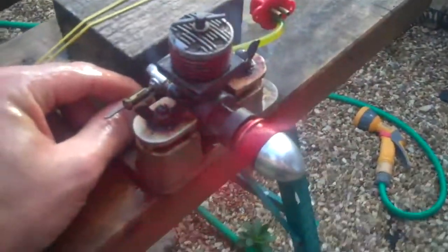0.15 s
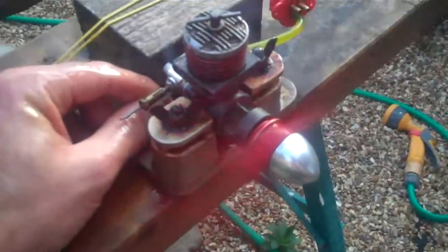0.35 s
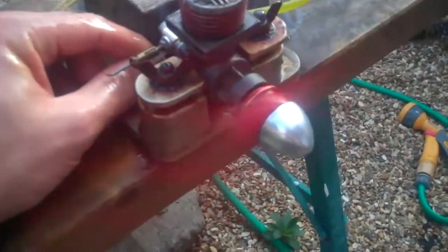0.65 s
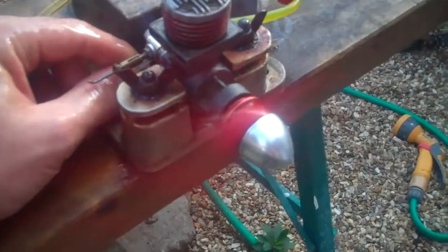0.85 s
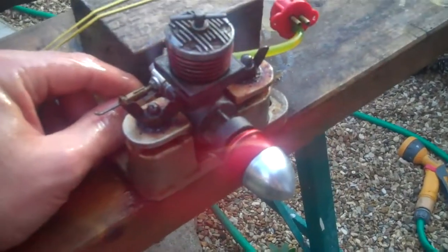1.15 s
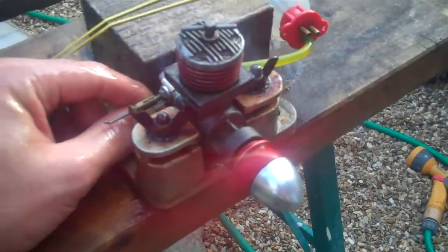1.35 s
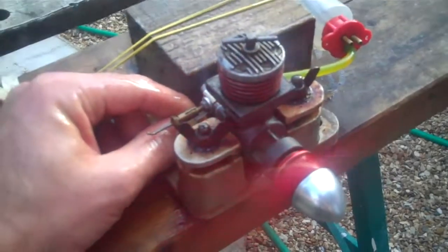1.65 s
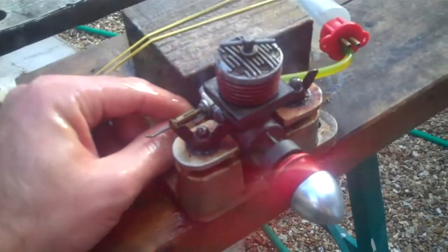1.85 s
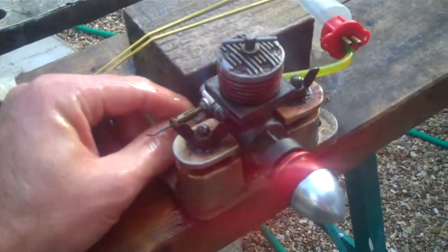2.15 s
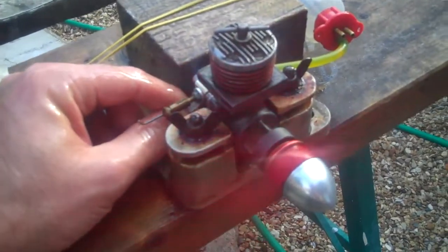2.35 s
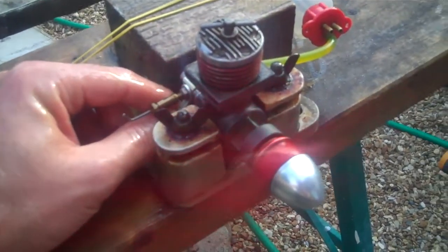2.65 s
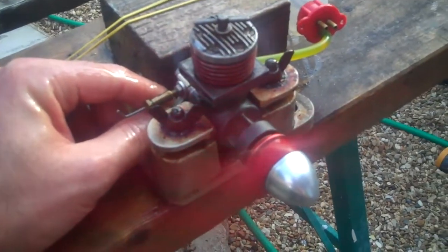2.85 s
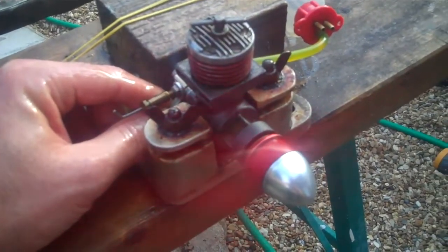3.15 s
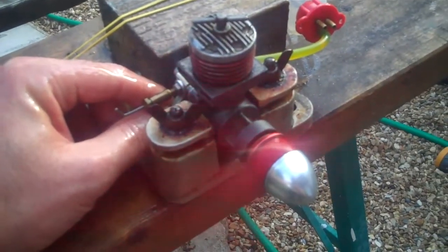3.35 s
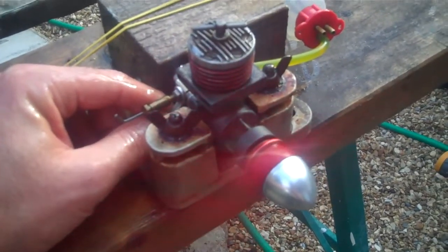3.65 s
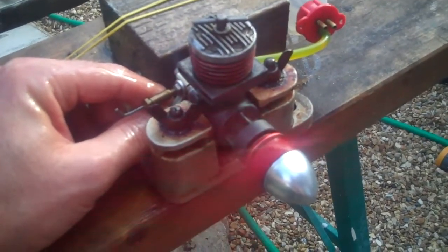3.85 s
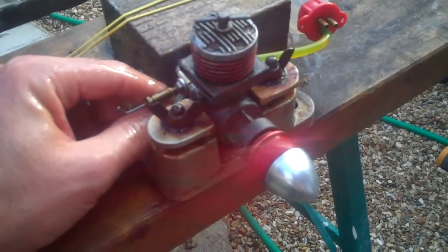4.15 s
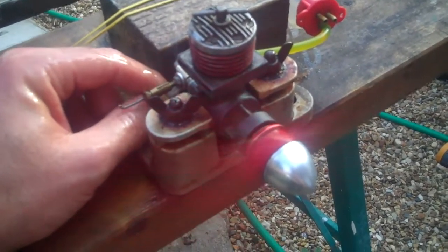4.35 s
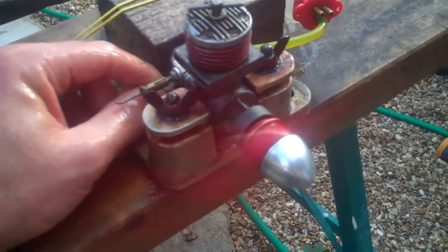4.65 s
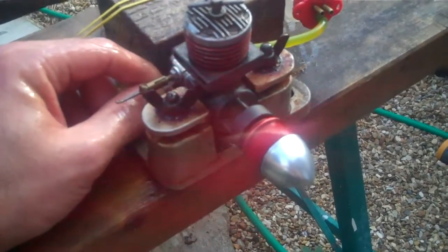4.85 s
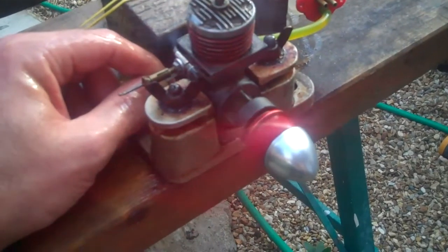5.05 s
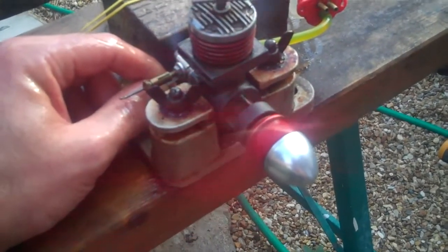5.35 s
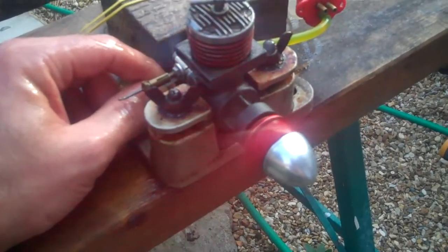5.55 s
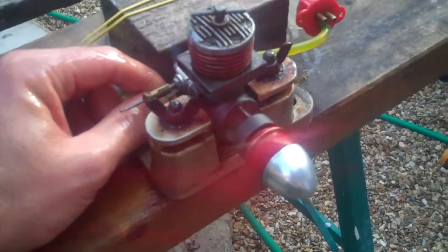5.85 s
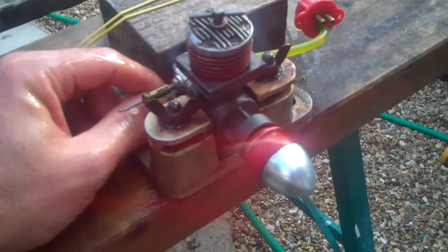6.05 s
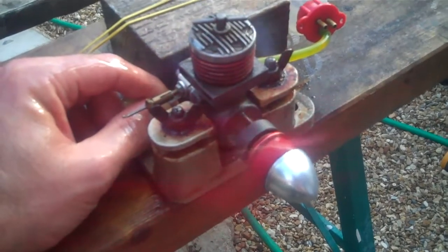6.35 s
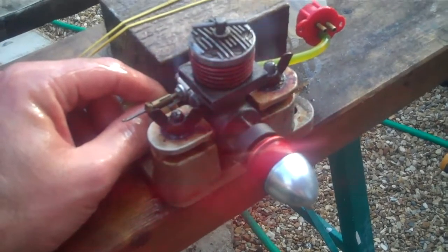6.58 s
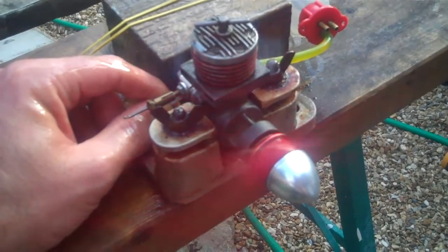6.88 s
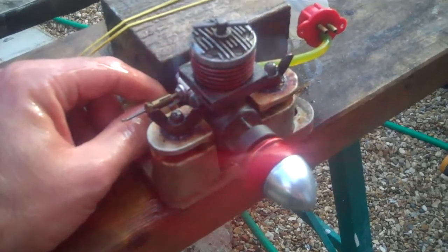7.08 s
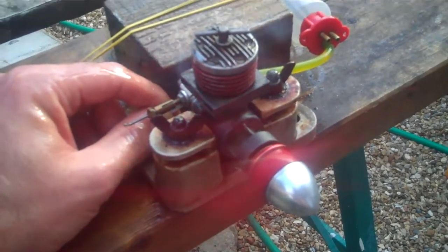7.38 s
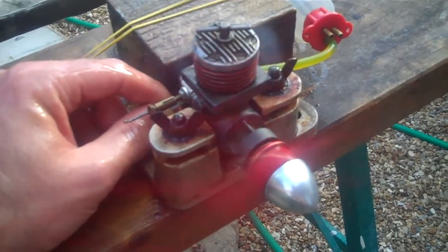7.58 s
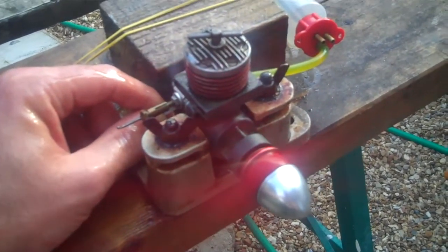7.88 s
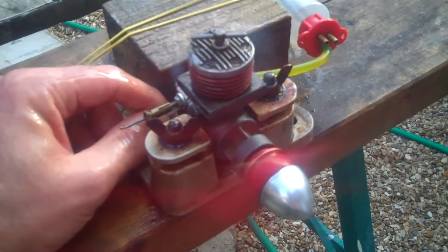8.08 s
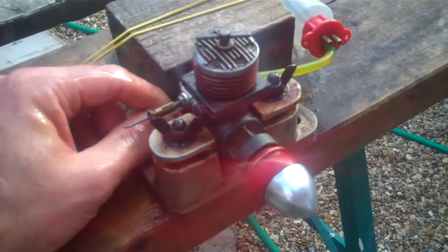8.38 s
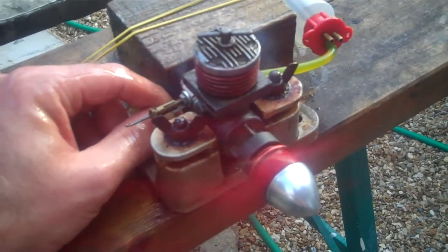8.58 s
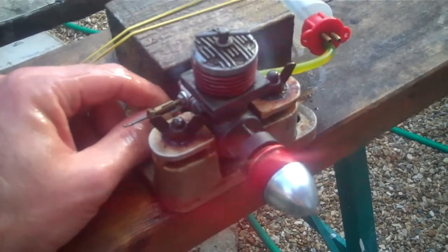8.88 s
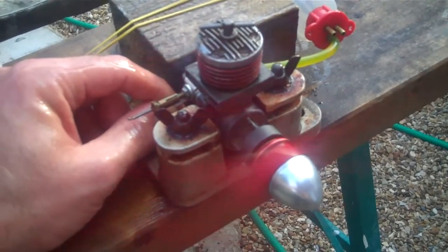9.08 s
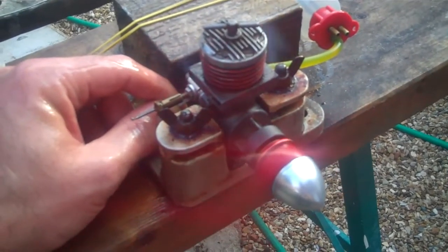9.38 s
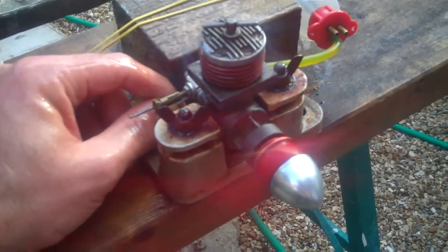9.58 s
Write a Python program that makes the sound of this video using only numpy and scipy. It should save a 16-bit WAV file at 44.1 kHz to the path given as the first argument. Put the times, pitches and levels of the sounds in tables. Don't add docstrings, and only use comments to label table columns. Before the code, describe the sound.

A miniature two-stroke engine is already running at full cry, very close to a phone on an outdoor bench. Rapid exhaust cracks, nearly a hundred a second, fuse into a harsh, nasal buzz over the propeller's hum at twice that rate, with intake clicks and a thin, high hiss. A tiny hiccup comes at 0.75 seconds, then the exhaust turns brighter and the pitch climbs unevenly, dipping slightly near 2. From 3.3 to 4.6 it holds its fastest, tightest buzz, with strong gusty air wash. Around 5.0 it loses power for a fifth of a second, sagging into duller thumps and hum, then relights with a knock and surges. More stumbles follow between 5.3 and 5.7. From 6 to 9.7 it runs lower and rougher, roughly ninety firings a second, with brief misfires, ragged snapping cracks and small bumps on the microphones. It is still running at the end.

```python
import sys
import numpy as np
from scipy import signal
from scipy.io import wavfile
from scipy.ndimage import uniform_filter1d

SR = 44100
rng = np.random.default_rng(int(sys.argv[2]) if len(sys.argv) > 2 else 0)


def ratio_of_db(decibels):
    return 10 ** (np.asarray(decibels, float) / 20)


def master(y):
    cut = np.clip(np.atleast_2d(y).T, -1, 1)
    pcm = np.round(cut * 32767)
    wavfile.write(sys.argv[1], SR, pcm.astype(np.int16))


N = 428652

FIRST_TURN = .355
INTAKE_TURN = .345
BLAST_LAW = (-9.5, -3.5)
FLOOD_S = .085


def law(hz, db, db_per_octave):
    return db + db_per_octave * np.log2(hz / 100)


def at_level(x, db):
    return x * ratio_of_db(db) / np.sqrt(np.mean(x ** 2))


def ring(x, hz, width):
    return signal.lfilter(*signal.iirpeak(hz, hz / width, SR), x)


def echo(x, response):
    return signal.oaconvolve(np.asarray(x), np.asarray(response), axes=-1)[..., :N]


def colour(x, table):
    tap = signal.unit_impulse(shape=2048)
    rings = [ring(ring(tap, *m[:2]), *m[:2]) for m in table]
    return echo(x, ratio_of_db(np.array(table)[:, 2:4].T) @ rings)


def clicks(s, size):
    at = np.clip(s * SR, 8, N - 9)
    k = np.floor(at)[:, None] + np.arange(-7, 9)
    d = k - at[:, None]
    shape = np.sinc(d) * np.cos(np.pi * d / 16) ** 2
    return np.bincount(k.astype(int).ravel(), (size[:, None] * shape).ravel(), N)


def tail(x, ms):
    return signal.lfilter([1], [1, -np.exp(-1000 / (ms * SR))], x)


def nearest(s, times):
    return np.isin(np.arange(len(s)), np.abs(s[:, None] - np.array(times)).argmin(axis=0))


def port(s, table):
    pulse = clicks(s, ratio_of_db(.5 * rng.standard_normal(len(s))))
    return at_level(colour([pulse, pulse], table), 0)


# (t/s, length/s, lost level/dB, knock level on the second stroke after relight/dB)
MISFIRES = [(0.752, 0.01, -3, -40), (1.765, 0.01, -3, -45), (5.019, 0.202, -11, -12),
            (5.317, 0.01, -3, -45), (5.426, 0.022, -3, -50), (5.449, 0.071, -9, -50),
            (5.521, 0.011, -5, -19), (5.618, 0.023, -4, -50), (5.641, 0.065, -10, -20),
            (5.839, 0.01, -3, -45), (6.025, 0.033, -9, -32), (6.104, 0.034, -8, -32),
            (6.388, 0.01, -4, -32), (6.444, 0.01, -3, -45), (6.467, 0.021, -6, -30),
            (6.808, 0.011, -9, -35), (6.991, 0.022, -7, -45), (7.026, 0.01, -3, -45),
            (7.061, 0.011, -6, -33), (7.202, 0.011, -3, -45), (7.812, 0.033, -6, -33),
            (8.705, 0.021, -6, -32), (8.737, 0.01, -3, -45), (8.866, 0.01, -4, -35), (9.006, 0.01, -5, -33),
            (9.093, 0.01, -3, -36), (9.263, 0.01, -3, -45), (9.398, 0.01, -4, -45), (9.506, 0.01, -7, -32),
            (9.693, 0.027, -8, -50)]
# (t/s, f/Hz)
NEEDLE = [(0.0, 95.84), (0.556, 104.0), (0.835, 102.57), (1.896, 115.71), (2.038, 109.26), (2.478, 118.44),
          (2.957, 119.78), (3.358, 129.95), (4.301, 130.72), (4.622, 125.07), (5.618, 78.6),
          (5.737, 100.14), (6.246, 90.45), (7.497, 85.82), (7.505, 91.3), (8.314, 90.13), (8.318, 96.23),
          (9.72, 90.92)]


def shaft(t):
    step_s, drag = .002, .0207
    dead_db, surge, surge_s = -9.484, .8558, .0671
    steps = np.arange(0, t[-1] + step_s, step_s)
    torque = np.ones(len(steps))
    for start, length, loss_db, _ in MISFIRES:
        after = steps - start - length
        inside = np.clip(np.minimum(steps - start, -after) / step_s + .5, 0, 1)
        torque = torque - inside * min(1, loss_db / dead_db)
        left_over = np.tanh((length / FLOOD_S) ** 2)
        torque = torque + (after >= 0) * surge * left_over * np.exp(-abs(after) / surge_s)
    hz = [NEEDLE[0][1]]
    for push in np.interp(steps, *np.transpose(NEEDLE)) ** 2 * torque:
        hz.append(hz[-1] + step_s * drag * (push - hz[-1] ** 2))
    return np.interp(t, steps, hz[:-1])


def coasting(t):
    build_s = 0.25
    steps = t[::32]
    since = [np.where((steps > start) & (steps < start + length), steps - start, 0)
             for start, length, *_ in MISFIRES]
    share = 1 - np.exp(-np.sum(since, axis=0) / build_s)
    return np.interp(t, steps, uniform_filter1d(share, size=9))


def burn(s, hz):
    ease_db_per_s, ease_after_s, surge_db, surge_s = 93, .04, 10, 0.068
    db = law(hz, *BLAST_LAW)
    for start, length, loss_db, _ in MISFIRES:
        after = s - start - length
        cut = 1.35 * loss_db + ease_db_per_s * np.maximum(s - start - ease_after_s, 0)
        db = db + np.where((s > start) & (after < 0), cut, 0)
        surge = surge_db * np.tanh((length / FLOOD_S) ** 2) * np.exp(-np.abs(after) / surge_s)
        db = db + np.where(after >= 0, surge, 0)
    return db


# (multiple of shaft rate, level against the hum/dB, dB per octave, lag/rad)
SHAKE = [(1, -27, 32, 0.65), (3, -18, 22.5, 0.84), (5, -30.5, 41, 0.085)]


def propeller(turns, hz, coast):
    blade_turn, windmill_db = 0.3055, 11
    angle = 4 * np.pi * (turns - blade_turn)
    tone = np.cos(angle) + ratio_of_db(law(hz, -15, 16)) * np.cos(2 * angle + 1.74)
    for multiple, db, rise_db, late in SHAKE:
        tone += ratio_of_db(law(hz, db, rise_db)) * np.cos(multiple * angle / 2 - late)
    sides = ratio_of_db(np.array([[-0.3], [0.04]]))
    return ratio_of_db(law(hz, -26.5, 11.2) + windmill_db * coast) * np.sqrt(2) * tone * sides


# (f/Hz, width/Hz, left level/dB, right level/dB)
WASH = [(2290, 3400, 19, 2), (5250, 4500, -36, -47), (7200, 6100, -37, -38), (8450, 830, 2, -18),
        (13500, 5000, 6, 5)]


def wash(hz):
    low_pass = signal.ellip(6, .5, 40, 14300, fs=SR, output="sos")
    air = signal.sosfilt(low_pass, rng.standard_normal((2, N)))
    gusts_db = at_level(uniform_filter1d(rng.standard_normal(N), size=3000), 8)
    return at_level(colour(air, WASH), -41) * (hz / 100) ** 3 * ratio_of_db(gusts_db)


# (f/Hz, width/Hz, left level/dB, right level/dB)
SUCK = [(6300, 900, -4, -0.5), (7100, 1300, 6.5, -5), (8270, 1600, -1, -13), (9100, 1500, -12.5, -22)]


def suction(turns, hz, coast):
    open_turns, coast_db = 0.9, 14
    part = ((turns - INTAKE_TURN) % 1) / open_turns
    gate = np.where(part < 1, np.sqrt(np.clip(1 - part, 0, 1)), 0) + 0.17
    hiss = at_level(colour(gate * rng.standard_normal((2, N)), SUCK), 0)
    return ratio_of_db(law(hz, -37, 2) + coast_db * coast) * hiss


# (f/Hz, width/Hz, left level/dB, right level/dB)
SPIT = [(4780, 1700, -1, 5.5), (6300, 1500, 1.5, -4), (7700, 980, 4.5, -7), (8930, 1400, -6, -28),
        (11170, 3500, -6, -20), (13600, 3800, -10, -11)]


def spit(s, hz, db):
    lead_ms, decay_ms, snap_gap_ms, snap_share = 0.85, 0.97, 0.366, 0.53
    size = ratio_of_db(2.0 * np.minimum(db + 13, 3) + 1.5 * rng.standard_normal(len(s)))
    gate = tail(tail(clicks(s - lead_ms / 1000, size), decay_ms), 0.35)
    noise = at_level(gate * (0.42 * rng.standard_normal(N) + rng.standard_normal((2, N))), 0)
    first = s - .00055
    snaps = at_level(clicks(first, size) - 0.96 * clicks(first + snap_gap_ms / 1000, size), 0)
    burst = np.sqrt(1 - snap_share) * noise + np.sqrt(snap_share) * snaps
    return ratio_of_db(law(hz, -34.5, 6.8)) * at_level(colour(burst, SPIT), 0)


# (t/s, f/Hz, level over the rest of the intake/dB)
VENTURI = [(0, 6400, -1.5), (.45, 6700, -5), (.8, 6300, -17), (1.4, 6600, -16), (2, 7000, -8),
           (3.2, 7000, -3), (5, 7200, -12), (5.3, 7100, -46), (9.72, 7200, -42)]


def whistle(s):
    ring_ms = 1.0
    t = np.arange(N) / SR
    since = t - s[np.maximum(np.searchsorted(s, t) - 1, 0)]
    at, hz, _ = np.transpose(VENTURI)
    swell = since * np.exp(-np.abs(since) * 2000 / ring_ms) * (since > 0)
    return at_level(np.sin(2 * np.pi * np.interp(t, at, hz) * since) * swell, 0)


def whistle_db(t):
    at, _, db = np.transpose(VENTURI)
    return np.interp(t, at, db)


# (f/Hz, width/Hz, left level/dB, right level/dB)
HISS = [(2330, 6100, 22.5, 24), (3660, 800, -6, -5), (5400, 1600, -2, 27.5), (7000, 700, -47, -11),
        (10700, 3300, 11, -59)]


def gas(s, db):
    puff = clicks(s - .0006, ratio_of_db(1.04 * (db + 8)))
    gate = tail(puff, 1.0) + 0.25 * tail(puff, 19)
    noise = 1.5 * rng.standard_normal(N) + 0.29 * rng.standard_normal((2, N))
    return ratio_of_db(-33) * at_level(colour(gate * noise, HISS), 0)


# (t/ms, left gain, right gain)
BOUNCES = [
    (0, 0.85, 0.66),
    (0.43, 0.62, 0.53),
    (0.864, 0.47, 0.54),
    (1.317, 0.23, 0.038),
]
CRACK_SHARE = np.array([1, .25, 0, 0])
# (f/Hz, width/Hz, left level/dB, right level/dB, left sign, right sign)
EXHAUST = [(2410, 1207, 6.5, 7.5, 1, 1), (1114, 1008, 7.5, 8.5, -1, -1), (158, 310, -7, -4, -1, 1),
           (358.6, 264, -2, 2.5, 1, 1)]
# (f/Hz, width/Hz, left level/dB, right level/dB, left sign, right sign)
STEEP = [(1039, 1136, 10.5, 11.5, 1, 1), (1794, 508, 3.5, 1.5, 1, 1), (3266, 290, 0, -5, -1, -1),
         (445, 270, 0, -32.5, -1, 1)]
# (f/Hz, width/Hz, left level/dB, right level/dB)
CRACK = [(3253, 300, 10, 12), (4570, 470, 2.5, 14), (5704, 700, -3, 18.5), (6820, 540, 12, -30),
         (9100, 820, 2.5, -9), (11900, 4100, -43, -3.5)]
HARSH = [6.075, 6.143, 6.257, 6.393, 6.449, 6.494, 6.54, 6.653, 6.699, 6.824, 7.031, 7.09, 7.207, 7.84,
         7.953, 8.055, 8.211, 8.277, 8.311, 8.421, 8.497, 8.562, 8.594, 8.636, 8.743, 8.775, 8.829, 8.893,
         8.904, 8.958, 8.99, 9.033, 9.142, 9.186, 9.24, 9.273, 9.317, 9.404, 9.534, 9.588, 9.665]
SOFT = [6.063, 6.426, 6.801, 7.019, 7.183, 7.805, 8.221, 8.232, 8.699, 8.882, 9.0, 9.087, 9.5, 9.686]


def exhaust(s, hz, db):
    clears_s, wet_port_db = .752, -9
    squeeze = 0.15
    twin_turn, twin_gain = .031, 0.0066
    bounces = np.array(BOUNCES)
    chance = rng.standard_normal((len(s), 2 + 2 * len(bounces)))
    power, grit, size_chance, time_chance = chance[:, 0], chance[:, 1], chance[:, 2::2], chance[:, 3::2]
    harsh, soft = nearest(s, HARSH), nearest(s, SOFT)
    db = np.where(harsh, np.maximum(db, law(hz, *BLAST_LAW)), db) + .5 * power
    crack_db = law(hz, -7, 18) + wet_port_db * (s < clears_s)
    sharp_db = 1.8 * (db + 10) - 10 + crack_db + 1.1 * grit + 4 * harsh - 6 * soft
    db = db - .4 * grit - 1.5 * harsh - 2.5 * soft
    ragged = (1 + harsh)[:, None]
    shape = 1 + .05 * ragged * size_chance
    bounce_ms = bounces[:, 0] * (92 / hz[:, None]) ** squeeze - .6
    jitter = 1.1e-5 * ragged * time_chance * (100 / hz[:, None]) ** 2
    at = s[:, None] + bounce_ms / 1000 + jitter
    late = at + twin_turn / hz[:, None]
    tap = signal.unit_impulse(shape=2048)
    body, sharp = np.zeros((2, 2, N))
    for side in range(2):
        size = bounces[:, 1 + side] * shape
        sharp[side] = clicks(at.ravel(), (CRACK_SHARE * size * ratio_of_db(sharp_db - 8.5)[:, None]).ravel())
        surges = (size * ratio_of_db(db)[:, None]).ravel()
        blast = clicks(at.ravel(), surges) + twin_gain * clicks(late.ravel(), surges)
        pipe = sum(np.sign(m[4 + side]) * ratio_of_db(m[2 + side]) * ring(tap, *m[:2]) for m in EXHAUST)
        for m in STEEP:
            pipe += np.sign(m[4 + side]) * ratio_of_db(m[2 + side]) * ring(ring(tap, *m[:2]), *m[:2])
        body[side] = echo(blast, pipe)
    body = signal.lfilter(*signal.butter(1, 7000, fs=SR), body)
    return ratio_of_db(22.5) * (body + colour(sharp, CRACK))


# (f/Hz, width/Hz, left level/dB, right level/dB)
PUMP = [(378.4, 220, 13, 19), (538, 220, 15, 22), (706, 265, -38, 17.5), (1010, 690, 6.5, 15.5)]


def case_pump(s, rate, hz):
    return ratio_of_db(law(hz, -31.5, 10)) * port(s + 0.083 / rate, PUMP)


# (f/Hz, width/Hz, left level/dB, right level/dB)
TRANSFER = [(1528, 155, -52, 21.5), (2505, 220, 13, 16.5), (3370, 1200, 14.5, 11.5)]


def transfer(s, rate, hz):
    return ratio_of_db(law(hz, -45, 44)) * port(s + 0.165 / rate, TRANSFER)


# (f/Hz, width/Hz, left level/dB, right level/dB)
INTAKE = [(5585, 780, -17, 3), (6050, 410, -8.5, 1.5), (6560, 890, 5, -27), (7210, 830, 5, -43),
          (4730, 910, -38, 0)]


def intake(s, hz):
    snap = clicks(s, ratio_of_db(rng.standard_normal(len(s))))
    breath = 0.065 * tail(snap, 2.8)
    steady = ring(snap + breath * rng.standard_normal(N), hz=7380, width=91)
    sides = ratio_of_db(np.array([[0], [-9]]))
    note = (whistle(s) + at_level(steady, -1.5)) * ratio_of_db(whistle_db(np.arange(N) / SR)) * sides
    air = at_level(colour(snap + breath * rng.standard_normal((2, N)), INTAKE), 0) + note
    low_pass = signal.butter(6, 7900, fs=SR, output="sos")
    return ratio_of_db(law(hz, -30.5, 6.9)) * signal.sosfilt(low_pass, air)


# (t/s, left step, right step)
JOLTS = [(0.314, -.37, -.07), (0.324, .24, .11), (0.466, -.22, -.01), (1.472, .05, -.22), (1.611, .05, -.2),
         (1.978, 0, -.2), (2.04, -.03, -.26), (2.148, -.24, -.12), (2.193, .21, .07), (2.255, -.27, -.07),
         (2.423, -.03, .2), (2.724, -.18, -.03), (2.759, 0, -.18), (2.792, -.18, -.05), (2.826, -.18, .09),
         (2.978, -.18, 0), (3.128, -.09, .18), (3.323, -.18, -.07), (3.355, 0, -.2), (3.458, .03, -.26),
         (3.544, 0, -.22), (3.777, 0, -.22), (3.838, 0, -.24), (3.861, 0, -.2), (3.923, .1, -.26),
         (4.061, -.22, .05), (4.084, -.09, .2), (4.222, .08, -.19), (4.23, .06, .24), (4.329, .2, .12),
         (4.79, -.03, .24), (5.24, -.04, -.47), (5.322, 0, -.2), (5.344, 0, .17), (5.539, .22, -.2),
         (5.563, -.03, .33), (5.725, -.03, .37), (5.821, 0, .18), (5.844, 0, -.2), (5.943, 0, .18),
         (5.965, 0, -.3), (6.076, 0, -.33), (6.258, 0, -.18), (6.393, 0, -.3), (6.449, 0, -.26),
         (6.506, 0, .39), (6.836, 0, .22), (6.916, 0, .24), (7.043, 0, .39), (7.382, 0, .18),
         (7.84, 0, -.22), (8.066, 0, .2), (8.743, 0, -.17), (8.904, -.03, .28), (8.968, 0, .22),
         (9.12, 0, -.18), (9.284, 0, .24), (9.404, 0, -.26), (9.534, 0, -.24)]


def jolts(s, hz, db):
    spread_db = np.array([law(hz, -29.5, 0), law(hz, -25.5, 11)])
    chance = np.clip(rng.laplace(size=(len(s), 2)).T, -1.7, 1.7)
    kick = chance * ratio_of_db(spread_db + 2 * np.minimum(db + 10, 0))
    big = np.array(JOLTS)
    kick[:, nearest(s, big[:, 0])] = 0
    steps = np.array([clicks(s, kick[side]) + clicks(big[:, 0], big[:, 1 + side]) for side in range(2)])
    soft = signal.lfilter(*signal.butter(2, 700, fs=SR), tail(steps, 3.8))
    return ratio_of_db(5) * signal.lfilter(*signal.butter(1, 22, "high", fs=SR), soft)


# (f/Hz, width/Hz, left level/dB, right level/dB)
WEAK = [(2620, 480, 9.5, 11.5)]


def weak_ping(s, rate, db):
    weak = db < law(rate, *BLAST_LAW) - 5
    ping = clicks(s + .00041, ratio_of_db(law(rate, 0, -20)) * weak)
    return colour([ping, ping], WEAK)


# (f/Hz, width/Hz, left level/dB, right level/dB)
COLD = [(370, 580, 2, 2.5), (710, 310, -4, -2), (1230, 570, -2, -8)]


def cold_thump(s, rate, coast):
    return ratio_of_db(-18) * coast * port(s + 0.1026 / rate, COLD)


def knock(s):
    relights = np.minimum(np.searchsorted(s, [m[0] + m[1] for m in MISFIRES]), len(s) - 2)
    gate = tail(clicks(s[relights + 1] - .0042, ratio_of_db(np.array(MISFIRES)[:, 3])), 4.5)
    noise = gate * (rng.standard_normal(N) + .5 * rng.standard_normal((2, N)))
    return ratio_of_db(12) * ring(ring(noise, hz=4800, width=3300), hz=4600, width=3300)


def yard(engine):
    decay = np.exp(-np.arange(6000) / (0.016 * SR)) * rng.standard_normal((2, 6000))
    return echo(engine, at_level(ring(decay, 920, 3300), -54.5))


# (f/Hz, width/Hz, shaft f/Hz, share taken out, negative
SPEED_BANDS = [(1710, 200, 115.3, 0.6), (340, 43, 116, 0.4), (3230, 580, 117, -0.9), (1360, 160, 126, 0.94),
               (1210, 130, 125.6, -0.03), (480, 190, 116.4, -0.78), (1065, 260, 90.8, -0.49),
               (3100, 250, 86, -0.47), (1930, 320, 93, -0.65), (490, 37, 92, -0.9), (800, 130, 113, 0.5),
               (1630, 160, 100.6, -0.44), (1070, 120, 130, 0.5), (5070, 1200, 89.4, -0.34),
               (3250, 420, 80, -0.52), (1180, 180, 111, -0.48)]


def speed_colour(near, hz):
    range_hz = 6.1
    return sum(share * np.exp(-((hz - at_hz) / range_hz) ** 2) * ring(near, band_hz, width)
               for band_hz, width, at_hz, share in SPEED_BANDS)


def scene():
    t = np.arange(N) / SR
    hz = shaft(t)
    turns = np.cumsum(hz) / SR - FIRST_TURN
    s = np.interp(np.arange(int(turns[-1]) + 1), turns, t)
    rate = np.interp(s, t, hz)
    db = burn(s, rate)
    coast = coasting(t)
    s = s + 4e-5 * (100 / rate) ** 3 * uniform_filter1d(rng.standard_normal(len(s)), size=3)
    s = s - 5e-5 * uniform_filter1d(np.minimum(db + 10, 0), size=2, origin=0)
    engine = exhaust(s, rate, db) + gas(s, db) + knock(s)
    engine -= np.clip((hz - 68) * 0.046, 0, .85) * ring(engine, 4600, 840)
    engine += intake(s + INTAKE_TURN / rate, hz)
    engine -= case_pump(s, rate, hz)
    engine += transfer(s, rate, hz)
    engine += suction(turns, hz, coast) + spit(s, hz, db)
    engine += ratio_of_db(-31.5 + whistle_db(t)) * whistle(s - .0007)
    engine += weak_ping(s, rate, db)
    engine -= cold_thump(s, rate, coast)
    near = engine + yard(engine) + propeller(turns, hz, coast)
    near -= speed_colour(near, hz)
    return near + wash(hz) + jolts(s, rate, db)


def ride(x):
    size, share, rest_db, down_s, up_s = 512, 0.14, -2, .01, 0.1
    blocks = np.abs(x[:, :N // size * size]).reshape(2, -1, size)
    peaks = 20 * np.log10(blocks.max(axis=(0, 2)) + 1e-6)
    held = [rest_db]
    for db in peaks:
        pace_s = down_s if db > held[-1] else up_s
        held.append(held[-1] + (db - held[-1]) * min(1, size / SR / pace_s))
    smooth = np.interp(np.arange(N), size * np.arange(len(held)), held)
    return x * ratio_of_db(-share * (smooth - rest_db))


def squelch(x, lo_hz, hi_hz, db, gain_db, fall_hz, size, order):
    hz, _, z = signal.stft(x, SR, nperseg=size)
    band = (hz > lo_hz) & (hz < hi_hz)
    power = uniform_filter1d(np.abs(z[:, band]) ** 2, size=order, axis=1) + 1e-20
    usual = power.mean(axis=2, keepdims=True) ** .25 * uniform_filter1d(power, size=12, axis=2) ** .75
    slope = ratio_of_db(gain_db) * np.exp((lo_hz - hz[band, None]) / fall_hz)
    z[:, band] *= slope / (1 + (ratio_of_db(2 * db) * usual / power) ** 3)
    return signal.istft(z, SR, nperseg=size)[1][:, :N]


def top_cut(x):
    return signal.sosfilt(signal.butter(12, 15680, fs=SR, output="sos"), x)


def record(dry):
    top_hz = 14300
    x = ride(dry - 0.65 * ring(dry, 4164, 214))
    x = np.tanh(.6 * x) / .6
    x = squelch(x, 9400, top_hz, db=-4.5, gain_db=0.5, fall_hz=30000, size=1024, order=9)
    x = squelch(x, top_hz, SR, db=2.5, gain_db=-12, fall_hz=900, size=256, order=8)
    return top_cut(x)


dry = scene()
out = record(dry)
master(out)
```